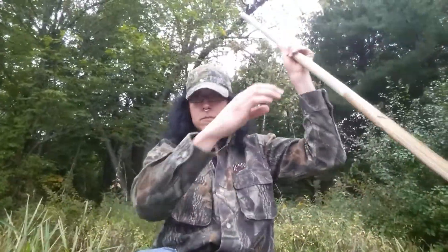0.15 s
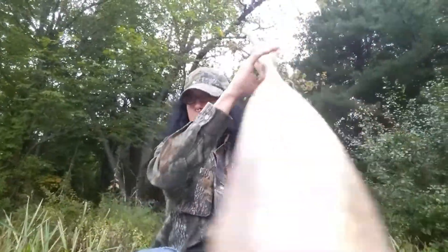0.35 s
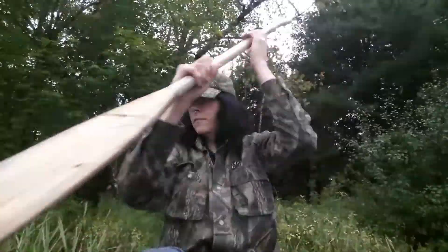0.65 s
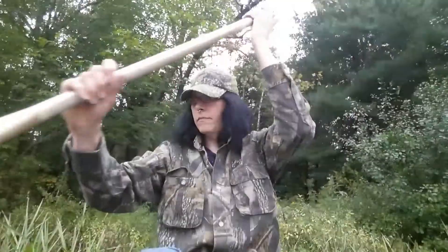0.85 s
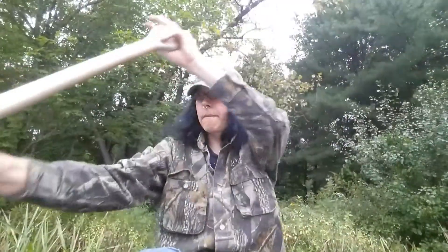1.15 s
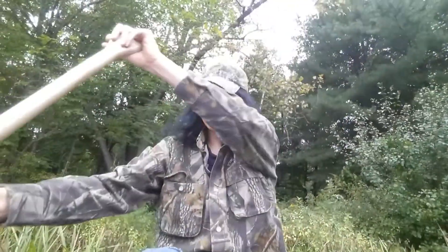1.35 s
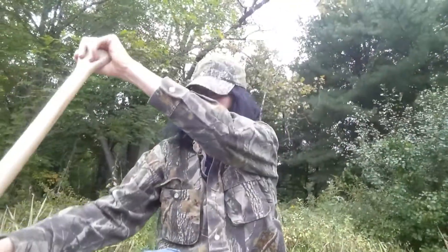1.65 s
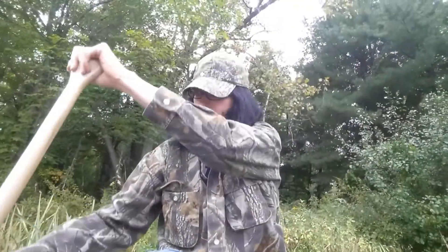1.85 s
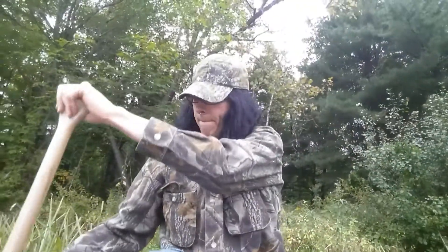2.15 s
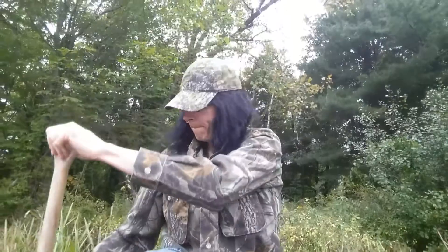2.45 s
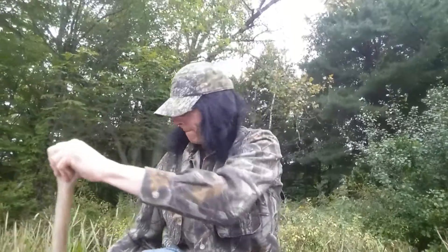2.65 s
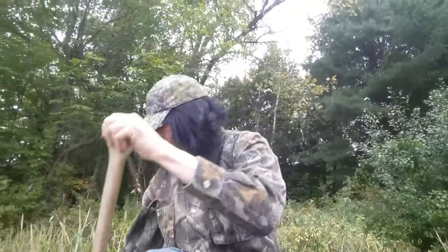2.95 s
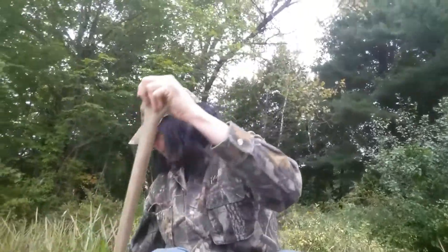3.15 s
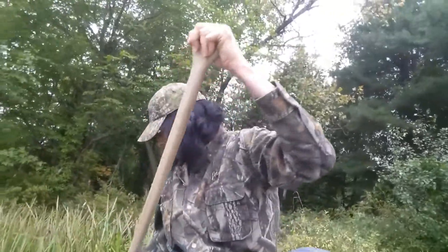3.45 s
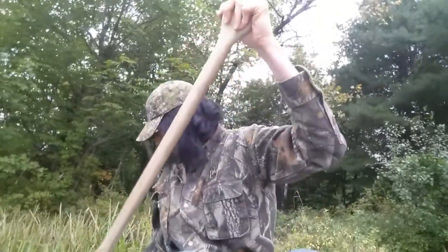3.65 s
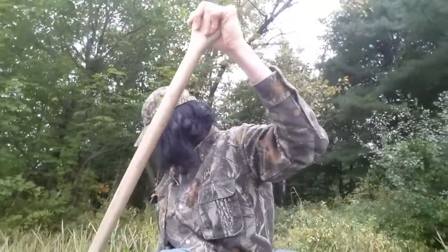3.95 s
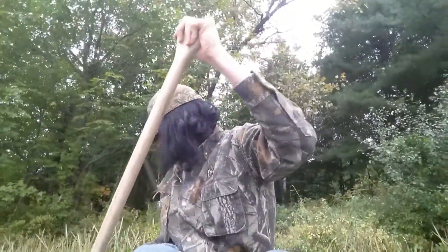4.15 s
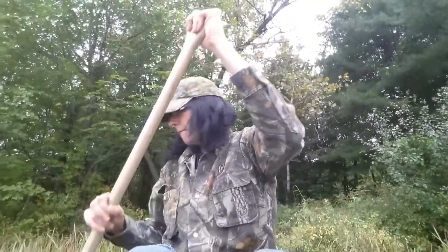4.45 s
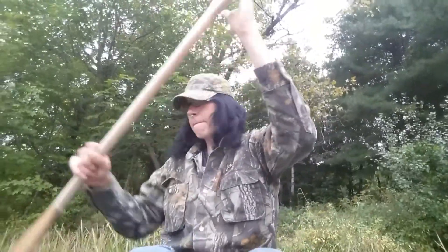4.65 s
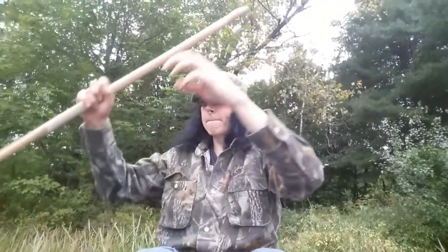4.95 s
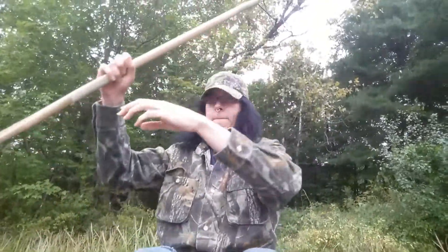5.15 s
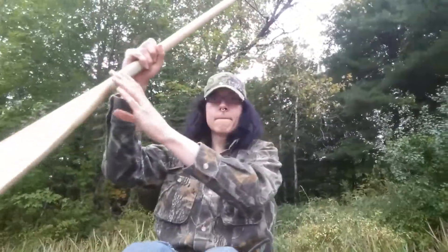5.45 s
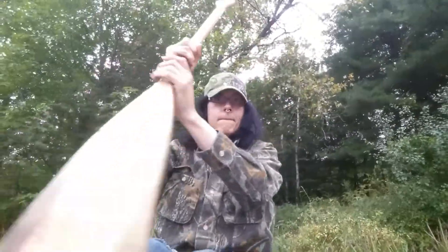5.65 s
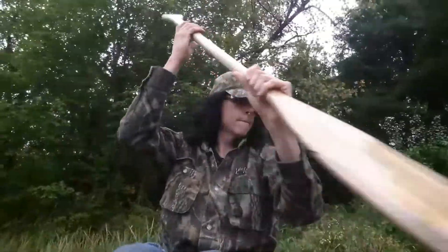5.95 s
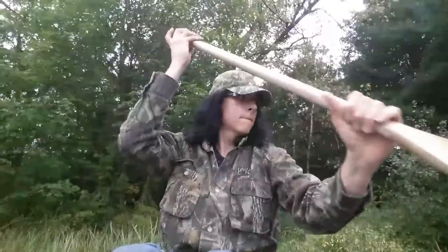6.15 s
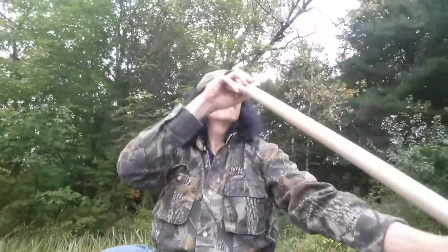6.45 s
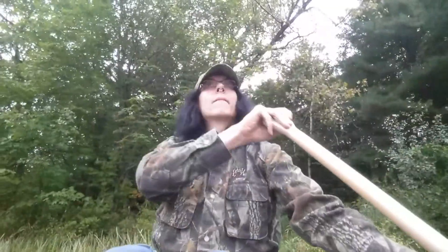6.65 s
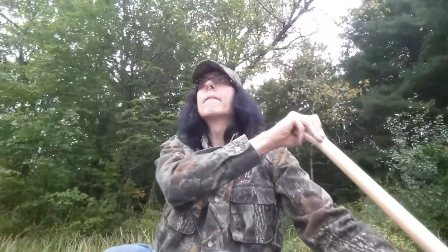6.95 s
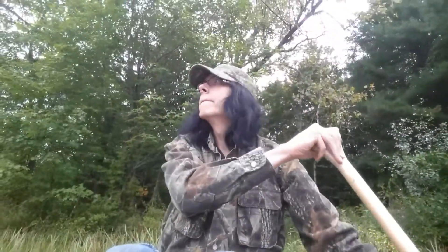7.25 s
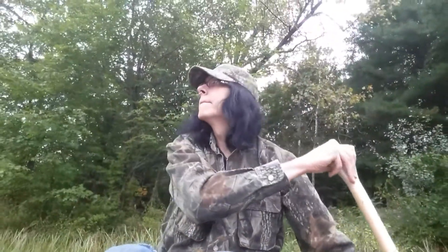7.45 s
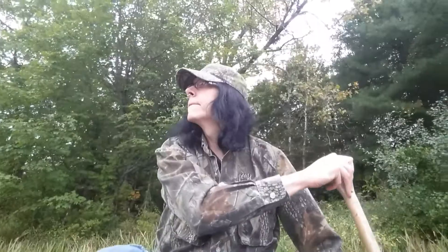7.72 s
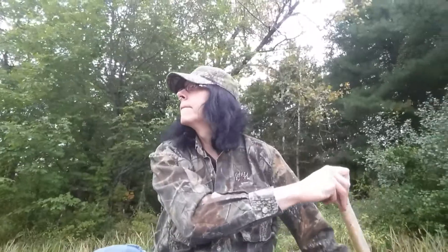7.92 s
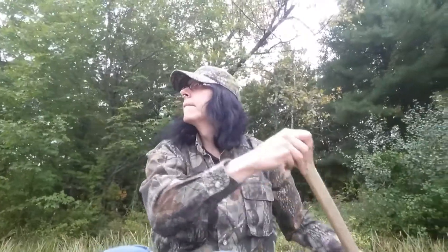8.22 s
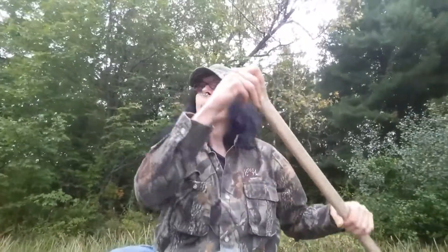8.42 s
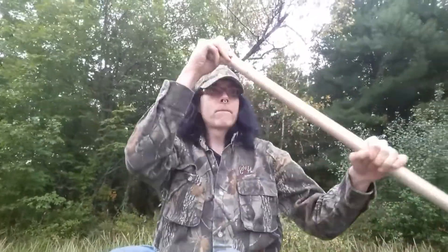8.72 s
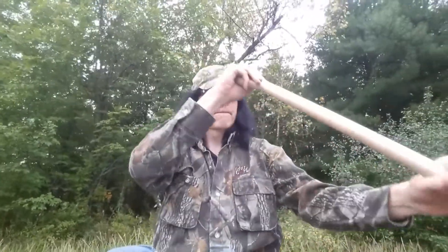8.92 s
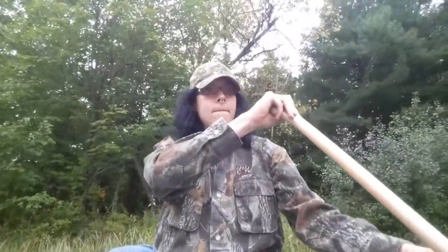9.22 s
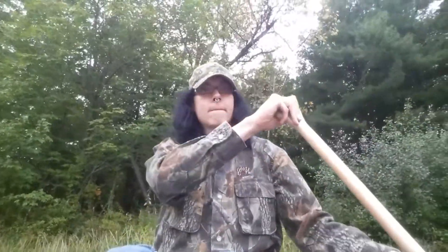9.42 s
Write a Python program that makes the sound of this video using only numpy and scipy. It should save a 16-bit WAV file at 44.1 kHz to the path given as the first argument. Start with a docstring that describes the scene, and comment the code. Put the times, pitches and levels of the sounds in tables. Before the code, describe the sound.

Paddle strokes on calm water: soft swirls, bubbling plops, jacket sleeves swishing, and hollow wooden thunks of the paddle knocking a canoe hull.

```python
"""A soft swirl of water and the swish of jacket sleeves open the scene, in a canoe on a calm lake.
Close to the microphone, shaped noise makes sleeves and sliding palms; snaps and bursts tick on the shaft.
The blade churns a noise wash and ringing bubbles; drops plop, and paddle blows ring the hull's modes.
One channel hears arms and water slightly early; this lag turns over when the paddle changes sides.
Underneath lie a low outdoor rumble and the microphone's own hiss, as steady coloured noise."""
import sys
import numpy as np
from scipy import signal
from scipy.fft import rfft, irfft, next_fast_len
from scipy.io import wavfile

SR = 44100
rng = np.random.default_rng(int(sys.argv[2]) if len(sys.argv) > 2 else 0)


def unload_wav(signal):
    """Save mono or channel-first audio to the path in sys.argv[1] as 16-bit WAV at rate SR, clipped to [-1, 1]."""
    wavfile.write(
        sys.argv[1],
        SR,
        np.round(np.clip(np.atleast_2d(signal).T, -1, 1) * 32767).astype(np.int16),
    )


N = 422478
TIME = np.arange(N) / SR
CUTOFF_HZ = 15850

# Steady background, low outdoor rumble and microphone hiss: (f/Hz, relative density/dB)
BACKGROUND_SPECTRUM = [(15, -41), (25, -9), (107, 1), (284, -9.5), (572, -14), (691, -15), (812, -17.5),
                       (981, -14), (1730, -22.5), (1930, -18), (5370, -35.5), (9720, -22), (15800, -22)]
BACKGROUND_DB = -58
# Likeness of the two channels: (f/Hz, correlation)
CHANNEL_LIKENESS = [(25, 1), (70, 1), (280, 0.85), (640, 0.56), (1400, 0.062), (15000, 0.013)]

# Blade moving through the water: (start t/s, length t/s, swirl level/dB, bubble level re the swirl/dB)
BLADE_PULLS = [(0.0, 0.031, -49, -6), (0.152, 0.72, -57.5, -9), (1.666, 0.72, -48, -2),
               (2.42, 1.96, -48.5, -12), (4.4, 0.52, -54.5, -12), (6.066, 0.059, -50, -8),
               (6.5, 0.19, -58.5, -6), (7.36, 0.47, -55.5, 0.5), (7.66, .48, -52.5, -2),
               (9.12, 0.056, -55, -6)]
# Wash of the blade, spectrum: (f/Hz, relative density/dB)
WASH_SPECTRUM = [(100, -11.5), (240, 0.5), (420, -1.5), (700, -4), (1300, -9.5), (2500, -14), (6000, -42)]
PULL_ATTACK_TAU_S, SETTLE_T60_S = 0.031, 0.75   # the swirl builds quickly and settles slowly
WAKE_DB = -68   # flow that remains between pulls
# the hull's low murmur dies away with the glide and swells with each pull
GLIDE_DB, GLIDE_SAG_DB_PER_S, PULL_MURMUR_DB = -54.5, 1.4, -5.5

# How busy the arms are, as the rustle of the jacket: (t/s, level/dB)
ARM_EFFORT = [(0.0, -58), (0.64, -56), (1.01, -52), (1.28, -54.5), (1.44, -69), (1.68, -57.5),
              (1.92, -51.5), (4.19, -49.5), (5.12, -61), (5.63, -61.5), (5.92, -51.5), (6.48, -59.5),
              (6.69, -58), (6.91, -64.5), (7.71, -55), (8.48, -57.5), (8.7, -51), (9.58, -65)]
# Quick sweeps of an arm: (peak t/s, swish level/dB, length t/s, palm rub level re the swish/dB)
ARM_SWEEPS = [(0.897, -52.5, 0.07, -12), (1.187, -37.5, 0.03, -19), (1.403, -47, 0.053, -9),
              (1.665, -53, 0.0091, 5.5), (1.777, -46.5, 0.012, 1), (1.911, -49.5, 0.037, 2.5),
              (3.55, -42, 0.044, -5), (3.618, -44.5, 0.023, -1.5), (3.987, -46.5, 0.02, 0),
              (4.144, -42, 0.044, 0), (4.343, -44, 0.0068, -9), (4.469, -47, 0.027, -5),
              (5.74, -52, 0.03, -9.5), (5.856, -46, 0.018, -8), (5.975, -45, 0.019, -12),
              (6.668, -44.5, 0.096, -18), (6.791, -45.5, 0.065, -16), (8.54, -47.5, .022, -4.5),
              (9.12, -49, 0.041, -23), (9.212, -54, 0.029, 0.5)]
# Quick slides of a hand to a new grip: (peak t/s, level/dB, length t/s, f/Hz)
HAND_SLIDES = [(1.179, -46, 0.008, 2820), (4.103, -36, 0.0069, 2710), (5.862, -43.5, 0.017, 1920),
               (6.682, -44.5, 0.014, 2430), (8.563, -52.5, 0.029, 1330), (8.825, -48.5, 0.0067, 3240),
               (9.128, -42, 0.013, 2460)]
# Cloth on cloth, spectrum: (f/Hz, relative density/dB)
SLEEVE_SPECTRUM = [(2000, -24), (4500, -8), (7200, -13.5), (8500, -6), (9900, 4), (11500, -3.5),
                   (13500, -5.5), (16000, -9)]
# Palm on the shaft, spectrum: (f/Hz, relative density/dB)
PALM_SPECTRUM = [(500, 3), (1000, 0.5), (1600, 0.5), (2300, -0.5), (3200, 1), (4500, -3), (7000, -14),
                 (12000, -80)]
# levels re the effort; the share of the effort's swing that the palms follow
SLEEVE_DB, PALM_DB, PALM_FOLLOWS = 0, -4.5, 0.81
SWEEP_RISE, SWEEP_FALL = 1.33, 0.99   # width before and after the peak, as shares of the length

# Ticks of hands and cuffs on the shaft: (t/s, relative level/dB, t60/s)
SHAFT_TICKS = [(0.7679, -25.5, 0.037), (1.648, -37.5, 0.13), (1.756, -29.5, .09), (1.889, -32, .03),
               (1.912, -27.5, 0.037), (2.238, -31, .015), (3.477, -36, .03), (3.734, -32, 0.05),
               (3.755, -36.5, .04), (4.158, -24, 0.034), (4.213, -27, 0.095), (4.326, -31, 0.027),
               (7.522, -34, 0.014), (8.418, -38, 0.01), (8.487, -34, 0.013), (8.528, -28, 0.013),
               (8.596, -34.5, 0.0085), (8.730, -34, .02), (8.799, -35, .012), (9.097, -29, 0.012),
               (9.117, -25.5, 0.071), (9.195, -22.5, 0.0071)]

# Single bubbles, drops and splashes, and at 1.175 s probably a hand knock on the shaft:
# (t/s, relative level/dB, f/Hz, relative spray level/dB)
SINGLE_PLOPS = [(1.175, -43.5, 920, 12), (1.274, -37.5, 1770, 3.5), (1.289, -43, 2010, 6),
                (1.339, -36, 1215, 0.5), (1.379, -37, 2850, -2), (1.420, -45, 1260, 0),
                (1.448, -37, 2200, -2.5), (1.628, -39, 580, -20), (1.718, -47, 1400, 4),
                (1.756, -38, 1820, 9), (1.800, -37, 1310, 5), (1.823, -31, 2250, 0), (1.860, -48, 890, 3),
                (1.889, -48, 3260, 17), (1.908, -22, 409, -4.5), (1.91, -32, 2390, 3.5),
                (1.985, -34.5, 606, -9), (2.285, -28, 1380, -20), (2.369, -37, 693, 2.5),
                (2.425, -33.5, 1360, -6), (3.426, -40, 1700, 5), (3.765, -36.5, 2240, 3),
                (3.777, -26.5, 1056, -16), (3.785, -30.5, 762, 5), (4.020, -34.5, 955, -5),
                (4.123, -30, 1403, 7), (6.111, -48, 1080, 4), (6.116, -47.5, 454, 7), (7.366, -42, 2420, 2),
                (7.411, -41.5, 384, -12), (7.465, -35.5, 1480, -4), (7.537, -40, 573, -13),
                (7.635, -47, 1625, 8.5), (7.748, -38, 435, -10), (7.752, -33.5, 223, -15),
                (7.834, -40, 226, -18), (7.850, -45, 727, 9), (8.045, -40, 890, -2.5),
                (8.074, -36, 327, -22), (8.298, -43, 1514, 3), (9.183, -54, 475, 8.5),
                (9.214, -48, 2220, 5.5), (9.53, -53.5, 696, 10)]
# Stretches of scattered faint drops: (from t/s, to t/s, middle level/dB)
TRICKLE_SPANS = [(1.751, 2.498, -46.5), (7.352, 8.349, -49)]
# big bubbles ring longer: t60 at 1 kHz, and the power of the pitch by which it falls
PLOP_T60_S, PLOP_T60_POWER = .068, .65

# Paddle against hull: (t/s, blow level/dB, contact brightness f/Hz, thud f/Hz, thud level/dB, thud t60/s)
PADDLE_BUMPS = [(1.756, -26.0, 280.0, 110, -6.5, 0.13), (1.7773, -37.0, 400.0, 92, -17.0, 0.08),
                (3.4236, -17.0, 450.0, 176, -3.0, 0.21), (3.4455, -31.0, 230.0, 99, -11.5, 0.33),
                (3.4794, -25.5, 400.0, 120, -1.0, 0.06), (3.5091, -24.0, 450.0, 322, -9.5, 0.05),
                (3.5851, -27.5, 330.0, 109, -13.0, 0.16), (3.778, -32.5, 1070.0, 262, -31.0, 0.15),
                (4.1221, -12.5, 390.0, 380, -17.0, 0.14), (4.1387, -18.0, 550.0, 174, -16.0, 0.54),
                (4.1543, -15.0, 220.0, 134, -13.0, 0.36), (4.1815, -24.0, 530.0, 99, -18.5, 0.58),
                (4.2111, -19.5, 210.0, 486, -13.5, 0.05), (4.2524, -27.5, 270.0, 116, -18.5, 0.19)]
# Strong modes of the hull: (f/Hz, relative level/dB, t60/s)
HULL_MODES = [(93.1, -2.0, 1.01), (105.5, -10.5, 0.4), (117.6, -13.0, 1.09), (132.7, -8.0, 0.54),
              (143.4, -11.5, 0.92), (171.4, 0.5, 0.45), (183.6, -15.0, 0.83), (198.7, -7.0, 0.41),
              (229.5, -12.5, 0.62), (254.5, -16.5, 0.55), (279.9, -9.5, 0.7), (321.1, -14.0, 0.73),
              (349.6, -10.0, 0.49), (381.9, -7.0, 0.56), (413.5, -14.0, 0.43), (465.6, -10.5, 0.32),
              (492.1, -20.5, 0.35), (506.0, -7.0, 0.35), (529.9, -14.5, 0.31), (557.7, -20.5, 0.3),
              (592.5, -13.5, 0.23), (620.5, -19.0, 0.2), (652.7, -11.5, 0.21), (680.7, -20.5, 0.21),
              (700.7, -8.5, 0.19), (743.4, -18.0, 0.2), (778.3, -11.5, 0.21), (804.6, -18.0, 0.21)]
# The hull's crowd of small modes: (band centre f/Hz, relative band level/dB, t60/s)
HULL_CROWD = [(105, -5, 0.59), (170, -10, 0.86), (267, -20, 0.77), (400, -19.5, 0.65), (620, -10, 0.37),
              (1035, -8.5, 0.25), (1730, -4, 0.12)]

# the paddle changes sides between these times (s)
CROSSING_S = (5.3, 6.6)
# left level minus right level (dB), before and after the crossing
ARM_SIDE_DB, WATER_SIDE_DB, TICK_SIDE_DB = (-4.5, -1.3), (-5, -4.5), (-7.5, 1)


def from_db(db):
    """Decibels to gain."""
    return 10 ** (np.asarray(db) / 20)


def at_hz(points, hz):
    """Read a curve on a log-frequency axis."""
    f, value = np.transpose(points)
    return np.interp(np.log(hz + 1), np.log(f), value)


def pan(db):
    """Left and right gains for a left-minus-right level; their mean is 1."""
    gains = from_db(np.array([[.5], [-.5]]) * db)
    return gains / gains.mean(axis=0)


def paddle_side(before_after):
    """A value that changes over as the paddle crosses the canoe."""
    return np.interp(TIME, CROSSING_S, before_after)


def from_the_side(x):
    """One channel hears the sound slightly early; the lag turns over when the paddle changes sides."""
    lag = paddle_side((14, -16))   # samples by which the left trails the right
    samples = np.arange(N)
    left = np.interp(samples - lag / 2, samples, x[0])
    right = np.interp(samples + lag / 2, samples, x[1])
    return np.array([left, right])


def drift(rate):
    """Slow chance: random knots at this rate per second, joined by straight lines."""
    knots = rng.standard_normal(int(N / SR * rate) + 2)
    return np.interp(TIME * rate, np.arange(len(knots)), knots)


def low_pass(x, hz, order=2):
    """Butterworth low-pass."""
    sos = signal.butter(order, min(hz, SR / 2 - 100), fs=SR, output="sos")
    return signal.sosfilt(sos, x + 1e-18)


def band_pass(x, low_hz, high_hz, order=1):
    """Butterworth band-pass."""
    return signal.sosfilt(signal.butter(order, [low_hz, high_hz], "band", fs=SR, output="sos"), x)


def dying(t, t60):
    """Exponential decay that falls 60 dB in t60 seconds."""
    return np.exp(-np.log(1000) * t / t60)


def add(track, s, sound):
    """Mix a short sound in at a time."""
    i = round(s * SR)
    track[..., i:i + sound.shape[-1]] += sound[..., :N - i]


def white():
    """Two unrelated white noises."""
    return rng.standard_normal((2, N))


def coloured(source, spectrum):
    """Two unrelated signals become one stereo sound with this spectrum; its centre has rms 1."""
    size = next_fast_len(N, True)
    hz = np.arange(size // 2 + 1) * SR / size
    mid, side = rfft(source, size) * from_db(at_hz(spectrum, hz))
    alike = np.clip(at_hz(CHANNEL_LIKENESS, hz), -1, 1)
    stereo = np.sqrt(1 + alike) * mid + np.sqrt(1 - alike) * side * [[1], [-1]]
    out = irfft(stereo)[:, :N]
    return out / out.mean(axis=0).std()


def friction(spectrum, grain_db, catch_db):
    """Rubbing comes in tiny slips, grouped into slower catches."""
    unevenness = from_db(grain_db * drift(900) + catch_db * drift(60))
    return coloured(white() * unevenness, spectrum)


def background():
    """A low outdoor rumble and the microphone's own hiss: steady coloured noise, stronger on the right."""
    return from_db(BACKGROUND_DB) * coloured(white(), BACKGROUND_SPECTRUM) * pan(-3.5)


def pulls():
    """Strength of wash and bubbling: each pull builds, holds and settles, and their powers add."""
    flow_power, bubbling_power = from_db(WAKE_DB) ** 2, 0
    for s, length, db, bubbles_db in BLADE_PULLS:
        t = np.maximum(TIME - s, 0)
        build = 1 - np.exp(-t / PULL_ATTACK_TAU_S)
        pull = from_db(db) * build * dying(np.maximum(t - length, 0), SETTLE_T60_S)
        flow_power = flow_power + pull ** 2
        bubbling_power = bubbling_power + (from_db(bubbles_db) * pull) ** 2
    return np.sqrt(flow_power), np.sqrt(bubbling_power)


def bubble(hz, t60, rise):
    """A pocket of air rings and climbs in pitch as it nears the surface."""
    t = TIME[:int(t60 * SR) + 2]
    ring = np.sin(2 * np.pi * hz * t * (1 + rise * t / t60))
    return ring * dying(t, t60) * (1 - np.exp(-t * hz))


def swirl(count=1900, size_db=6, tilt_db=-6, cycles=17, wash_db=-3):
    """The blade churns a wash and many bubbles, higher ones fainter; the hull murmurs as it glides."""
    flow, bubbling = pulls()
    gurgle = np.zeros((2, N))
    for when, pitch, size, side in rng.random((count, 4)):
        hz = 230 * 12 ** pitch
        gain = from_db(size_db * 3.5 * size ** 2 + tilt_db * pitch)
        # every bubble lasts the same number of cycles
        ring = bubble(hz, cycles / hz, 0.22)
        add(gurgle, when * (N - 1) / SR, gain * ring * pan(12 * (side - .5)))
    wash = friction(WASH_SPECTRUM, grain_db=-2.0, catch_db=0.5)
    glide = np.hypot(from_db(GLIDE_DB - GLIDE_SAG_DB_PER_S * TIME), from_db(PULL_MURMUR_DB) * flow)
    murmur_spectrum = [(25, -22), (50, -1.5), (90, 0), (180, -2.5), (300, -16.0), (800, -35), (3000, -70)]
    murmur = glide * coloured(white(), murmur_spectrum)
    return bubbling * gurgle / gurgle.std() + from_db(wash_db) * flow * wash + murmur


def arm_motion():
    """Strength of sleeve swish and palm rub: the effort, with a bell-shaped swell for each sweep."""
    effort_s, effort_points_db = np.transpose(ARM_EFFORT)
    effort_db = np.interp(TIME, effort_s, effort_points_db)
    usual_db = effort_db.mean()
    swish_power = from_db(effort_db + SLEEVE_DB) ** 2
    rub_power = from_db(usual_db + PALM_FOLLOWS * (effort_db - usual_db) + PALM_DB) ** 2
    for s, db, length, palm_db in ARM_SWEEPS:
        width = length * np.where(TIME < s, SWEEP_RISE, SWEEP_FALL)
        swell = from_db(db) ** 2 * np.exp(-np.minimum(((TIME - s) / width) ** 2, 20))
        swish_power = swish_power + swell
        rub_power = rub_power + from_db(palm_db) ** 2 * swell
    return np.sqrt(swish_power), np.sqrt(rub_power)


def arms():
    """Cloth swishes over cloth; palms rub along the shaft and now and then slide with a short rasp."""
    swish, rub = arm_motion()
    sleeves = swish * friction(SLEEVE_SPECTRUM, grain_db=1.5, catch_db=1.73)
    hands = rub * friction(PALM_SPECTRUM, grain_db=1.5, catch_db=2.53)
    slips = white() * from_db(2.4 * drift(700))
    for s, db, length, hz in HAND_SLIDES:
        rasp = band_pass(slips, hz / 1.52, hz * 1.2)
        # a narrower resonance gives the rasp its pitch
        rasp = rasp + .5 * signal.lfilter(*signal.iirpeak(hz, 7, fs=SR), slips)
        swell = np.exp(-.5 * ((TIME - s) / length) ** 2)
        hands = hands + from_db(db) * rasp / rasp.std() * swell
    return from_the_side(sleeves + hands) * pan(paddle_side(ARM_SIDE_DB))


def ticks(level_db=-9, snap_db=3.5, snap_t60=0.0039):
    """Small hard touches, each a sharp snap and a bright burst that dies quickly."""
    envelope, t = np.zeros(N), TIME[:SR // 5]
    for s, db, t60 in SHAFT_TICKS:
        touch = dying(t, t60) + from_db(snap_db) * dying(t, snap_t60)
        add(envelope, s, from_db(db + level_db) * touch)
    spectrum = [(500, -36), (2500, -5.5), (5500, 3.5), (8000, 2.5), (10000, 17.5), (12500, 7.5), (16000, -6)]
    return envelope * coloured(white(), spectrum) * pan(paddle_side(TICK_SIDE_DB))


def trickles(drop_hz=1150, spread_octaves=1.0, spray_db=1.5, count=16):
    """Faint drops at random times, levels and pitches, as rows like those of the plops."""
    rows = []
    for start, end, db in TRICKLE_SPANS:
        for when, size, pitch in rng.random((count, 3)):
            hz = drop_hz * 2 ** (spread_octaves * (2 * pitch - 1))
            rows.append((start + when * (end - start), db + 6 * (size - .5), hz, spray_db))
    return rows


def plops(rise=0.092, splash_db=-7, satellite_db=-7, spray_attack_s=.001, spray_t60_share=1.47, count=5):
    """Mostly drops and gulps: a main ring, a few satellites around its pitch, and a patter of spray."""
    out = np.zeros((2, N))
    patter = from_db(4.5 * drift(393)[:SR // 2])
    for s, db, hz, spray_db in SINGLE_PLOPS + trickles():
        t60 = min(PLOP_T60_S * (hz / 1000) ** -PLOP_T60_POWER, .45)
        tone = bubble(hz, t60, rise)
        t = TIME[:len(tone)]
        noise = rng.standard_normal((2, SR // 2)) * patter
        spray = low_pass(band_pass(noise, hz / 2, hz * 2), hz * 1.87)
        spray = (spray / spray.std())[:, :len(tone)] * dying(t, t60 * spray_t60_share)
        spray = spray * (1 - np.exp(-t / spray_attack_s))
        add(out, s, from_db(db) * (tone + from_db(spray_db + splash_db) * spray))
        for delay, pitch, side in rng.random((count, 3)):
            satellite = bubble(hz * 2 ** (1.4 * (pitch - .5)), t60 * 0.9, rise)
            # later satellites are fainter
            gain = from_db(db + spray_db + satellite_db - 14.0 * delay)
            add(out, s + delay * t60 / 4, gain * satellite * pan(14 * (side - .5)))
    return out


def hull_response(body_db=-1, width_hz=550, waver_depth=0.71):
    """The hull answers one blow with strong, separately decaying modes in a crowd of small ones."""
    t = TIME[:3 * SR // 2]
    out = np.zeros((2, len(t)))
    for hz, db, t60 in HULL_CROWD:
        band = band_pass(rng.standard_normal((2, len(t))), hz / 1.25, hz * 1.25, order=3)
        out += from_db(db + body_db) * band / band.std() * dying(t, t60)
    for k, (hz, db, t60) in enumerate(HULL_MODES):
        # up to a limit, the higher a mode, the more its phase differs between the channels
        apart = min(hz / width_hz, .5) * rng.choice([-1, 1]) * np.array([[1], [-1]])
        turn = 2 * np.pi * hz * t
        # the ring starts steady and wavers as it dies
        waver = 1 + waver_depth * np.minimum(t / t60 * 5, 1) * drift(21.3)[:len(t)]
        ring = np.sin(turn) + apart * np.cos(turn)
        out += (-1) ** k * from_db(db) * ring * dying(t, t60) * waver
    return out


def hull(far_side_hz=300):
    """Each contact sets the whole hull ringing; the struck panel gives a short thud at its own pitch."""
    force, thuds, t = np.zeros(N), np.zeros(N), TIME[:SR // 2]
    swell = 1 - np.exp(-t / .005)
    for s, db, bright_hz, thud_hz, thud_db, t60 in PADDLE_BUMPS:
        add(force, s, from_db(db) * low_pass(signal.unit_impulse(len(t)), bright_hz))
        thud = np.sin(2 * np.pi * thud_hz * t) * dying(t, t60) * swell
        add(thuds, s, from_db(thud_db) * thud)
    out = signal.fftconvolve(force[None], hull_response())[:, :N] + thuds
    # a thin shell radiates little deep bass
    out = signal.sosfilt(signal.butter(2, 55, "high", fs=SR, output="sos"), out)
    # the blows are louder on the right, the bass less so
    bass = low_pass(out, far_side_hz, order=1)
    return bass * pan(-2.3) + (out - bass) * pan(-6.0)


def scene():
    """Water, arms, ticks and hull over the steady background."""
    water = from_the_side(swirl() + plops()) * pan(paddle_side(WATER_SIDE_DB))
    return background() + water + arms() + ticks() + hull()


def record(dry):
    """The top is cut steeply."""
    return signal.sosfilt(signal.ellip(12, .1, 80, CUTOFF_HZ, fs=SR, output="sos"), dry)


dry = scene()
out = record(dry)
unload_wav(out)
```